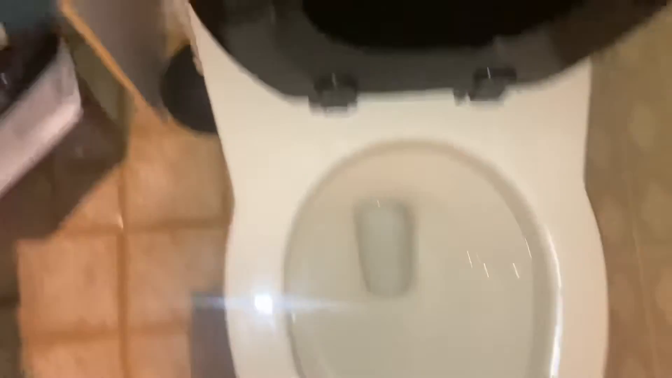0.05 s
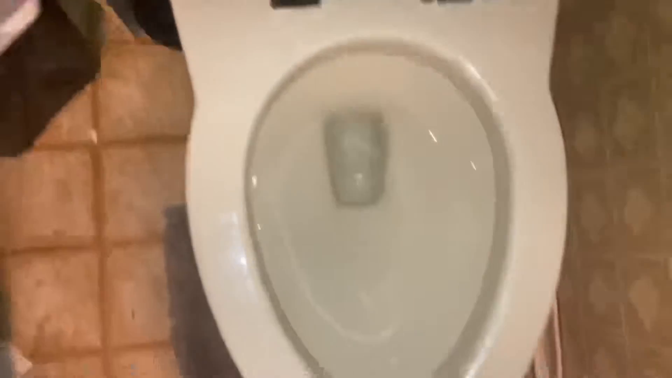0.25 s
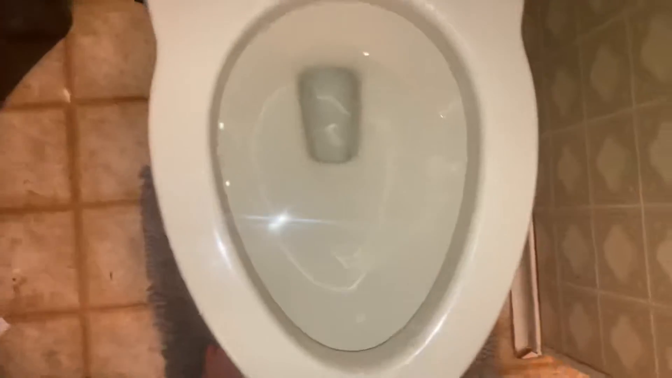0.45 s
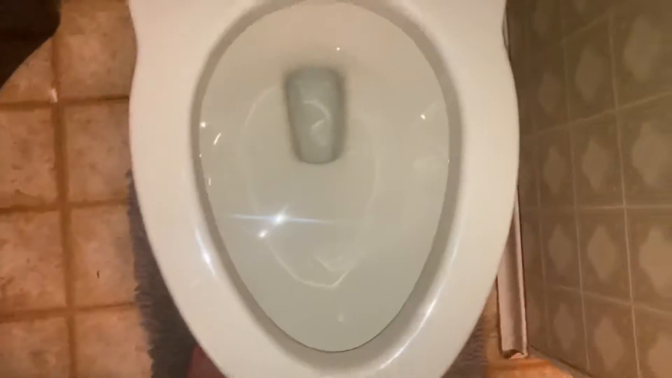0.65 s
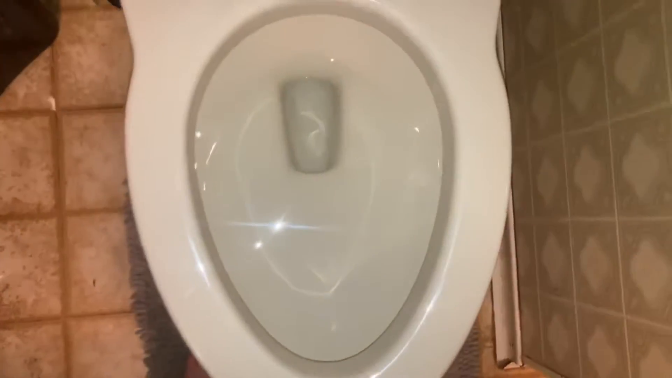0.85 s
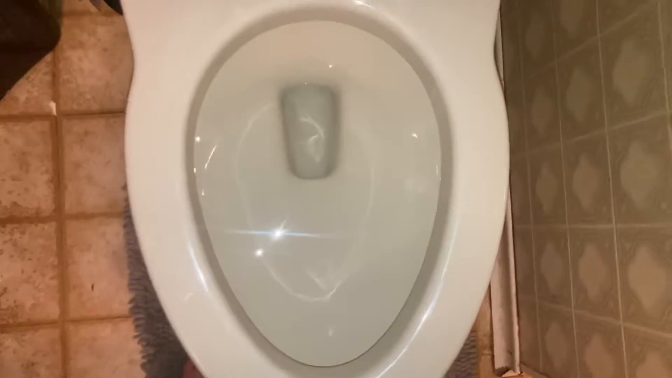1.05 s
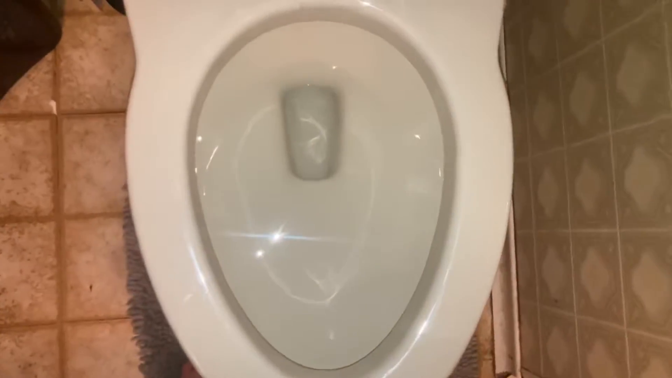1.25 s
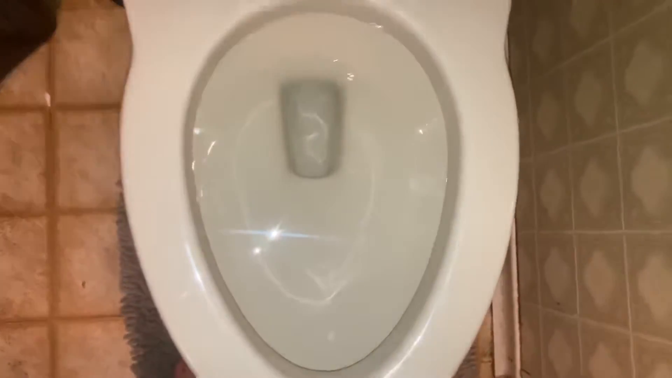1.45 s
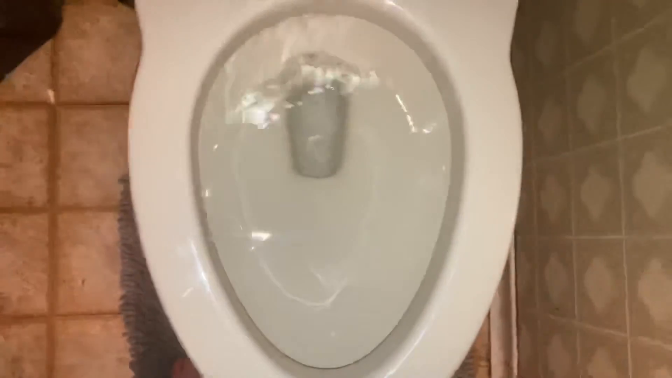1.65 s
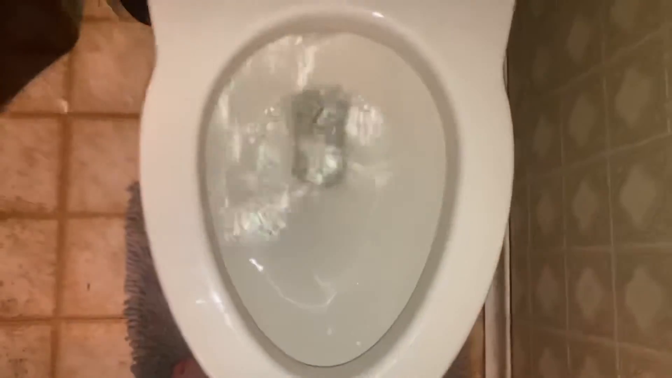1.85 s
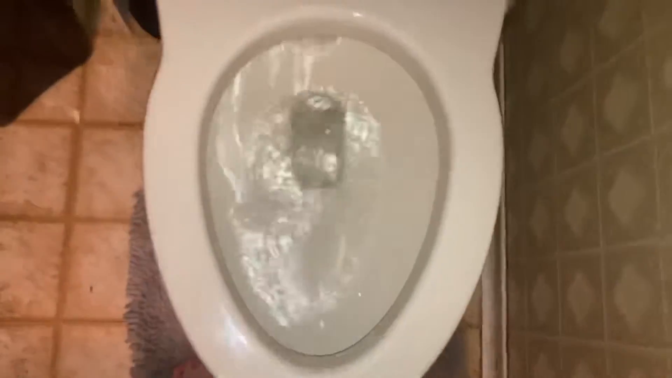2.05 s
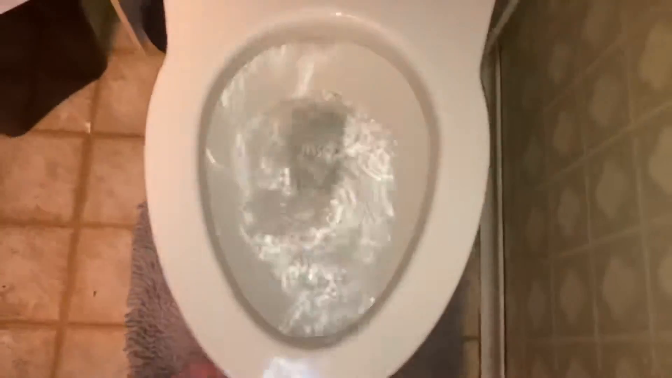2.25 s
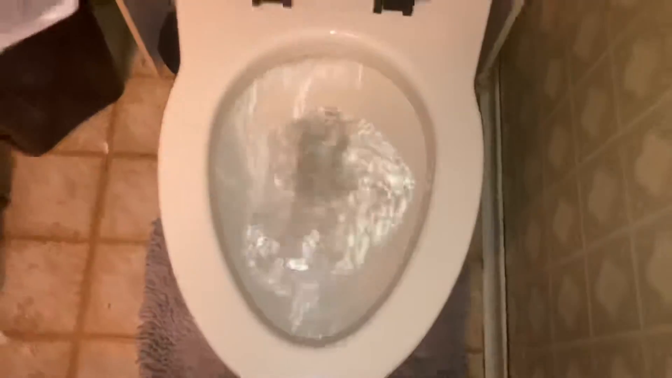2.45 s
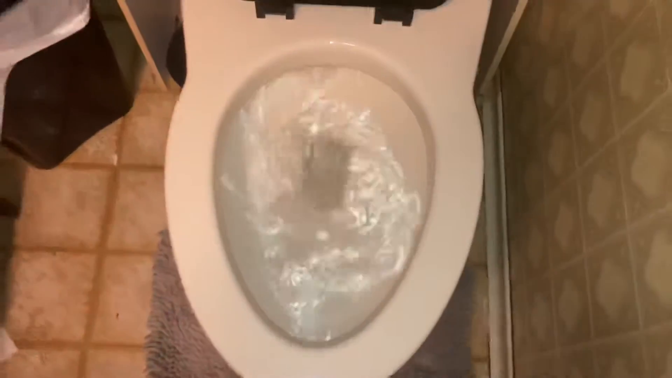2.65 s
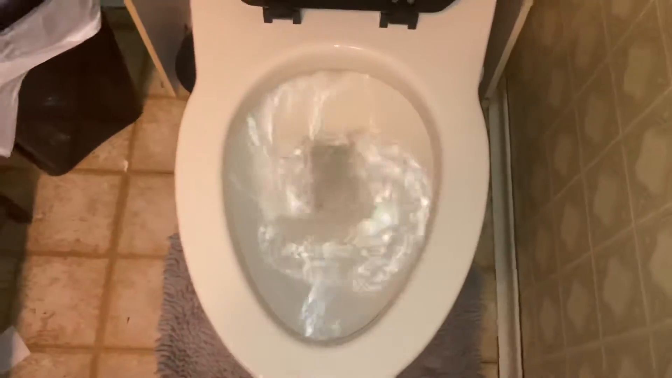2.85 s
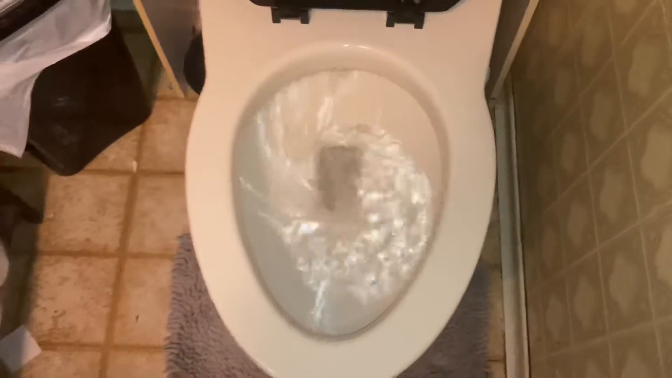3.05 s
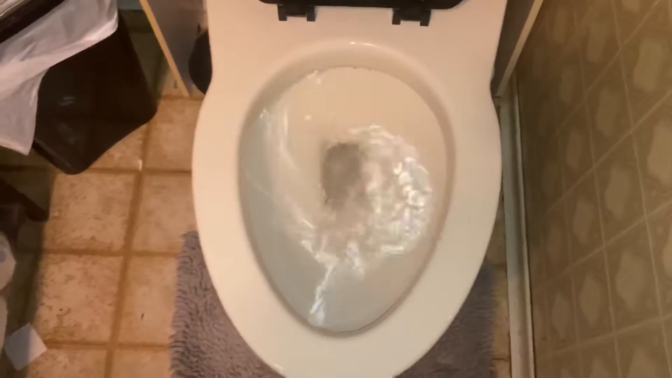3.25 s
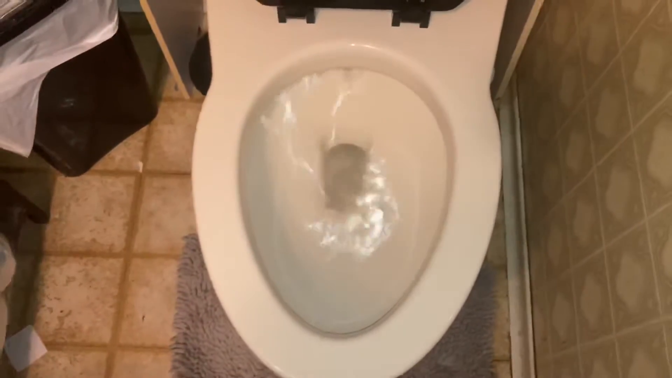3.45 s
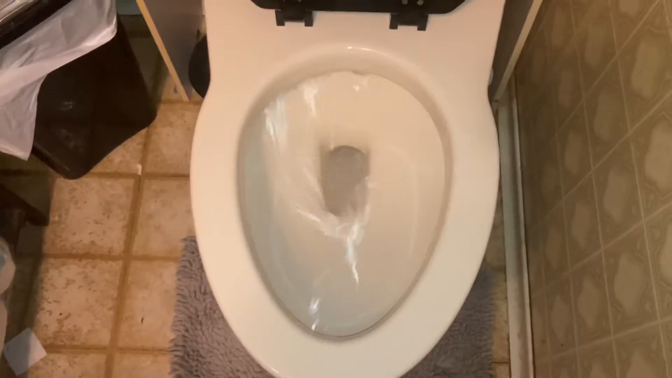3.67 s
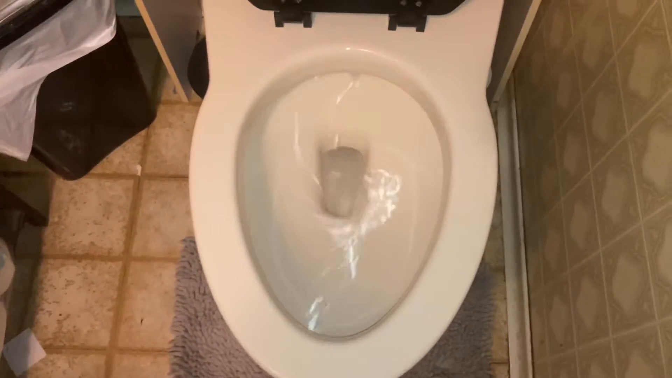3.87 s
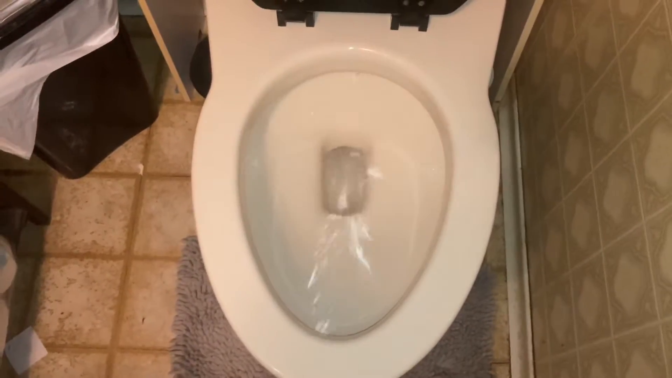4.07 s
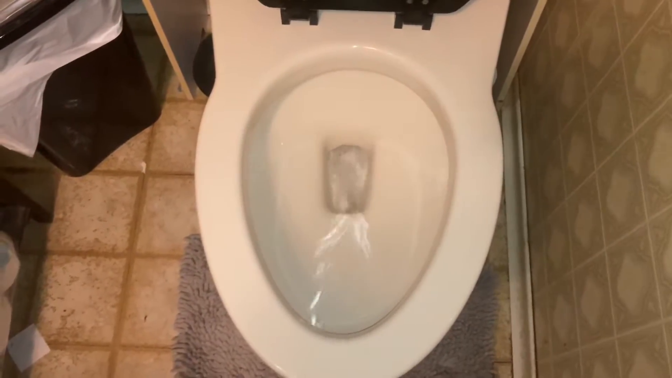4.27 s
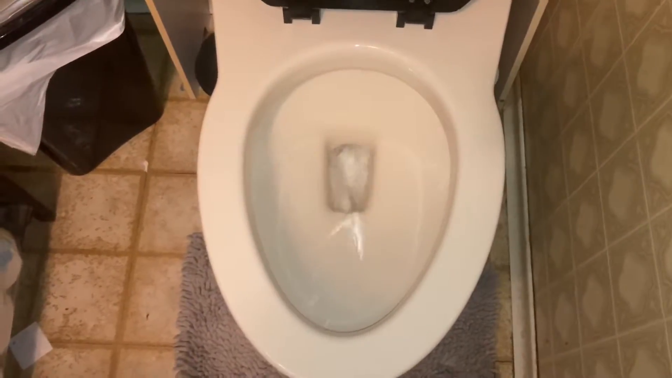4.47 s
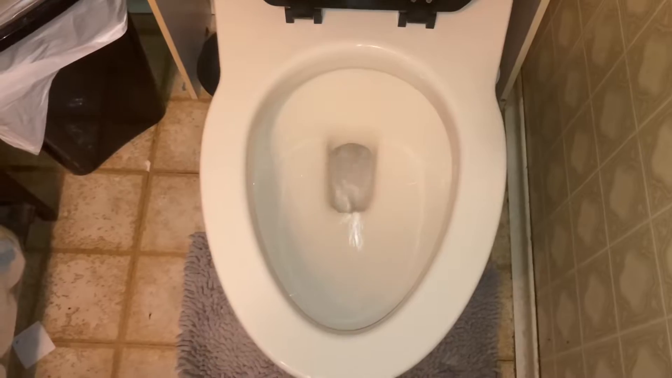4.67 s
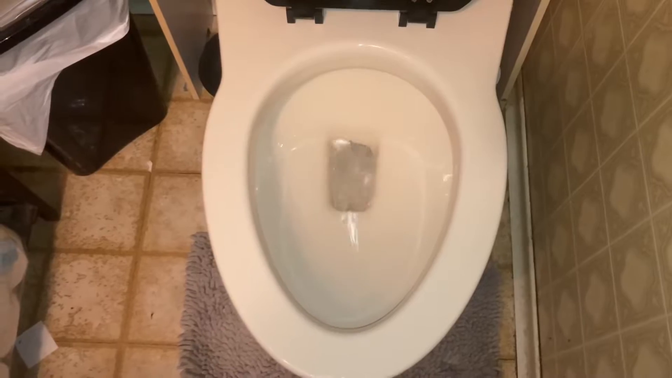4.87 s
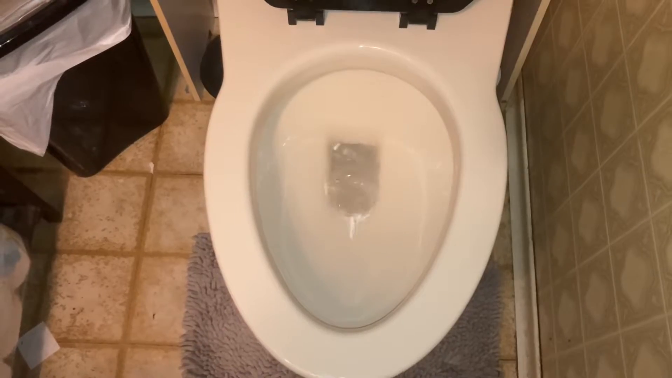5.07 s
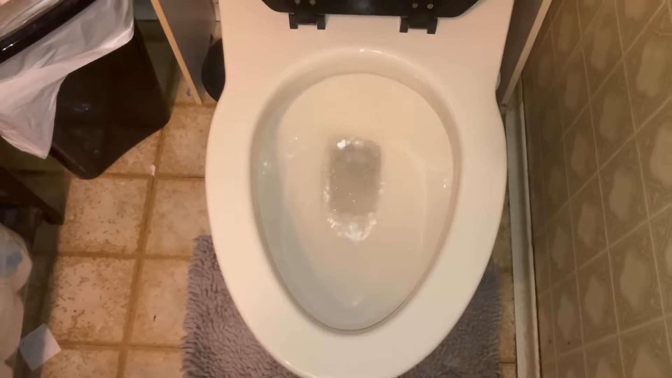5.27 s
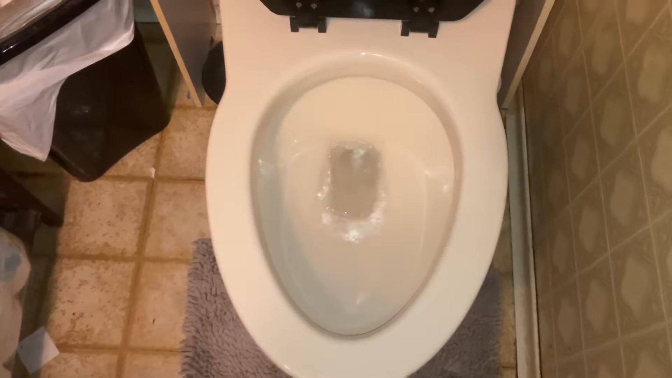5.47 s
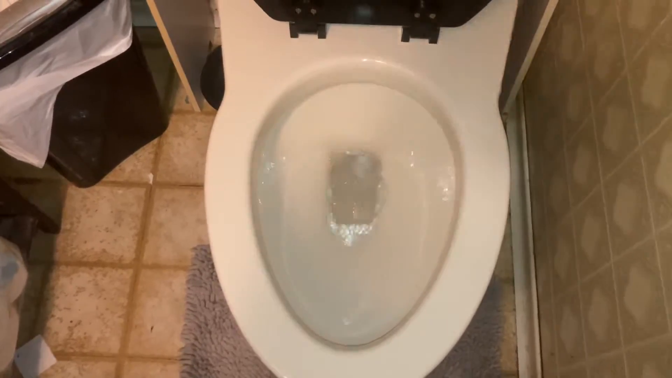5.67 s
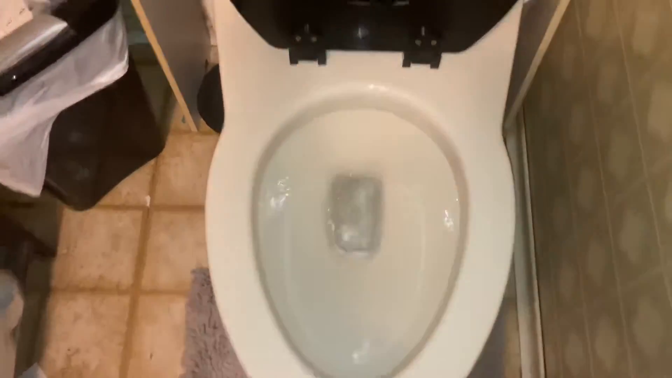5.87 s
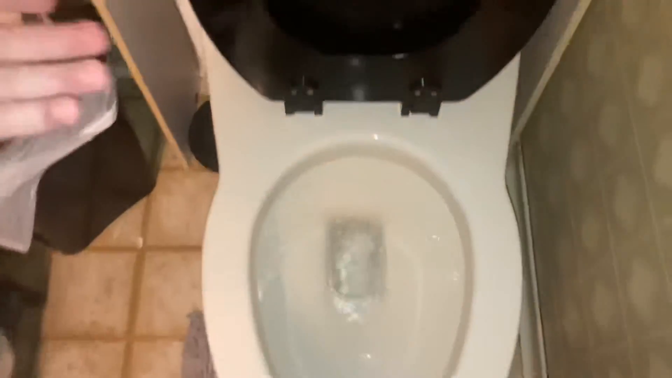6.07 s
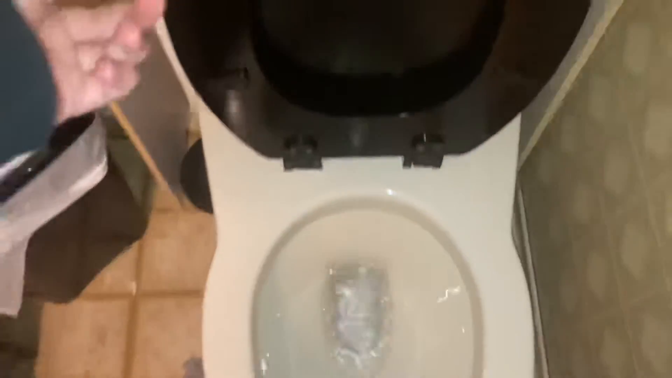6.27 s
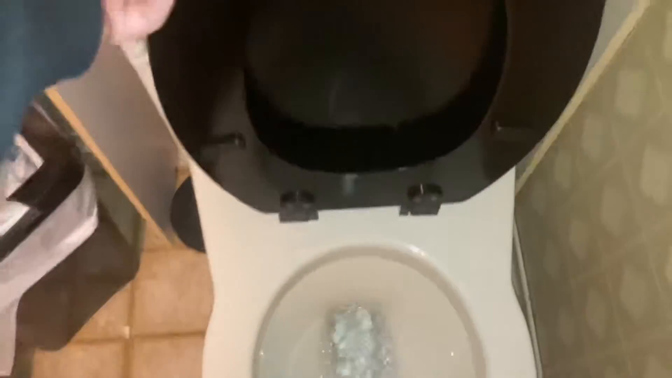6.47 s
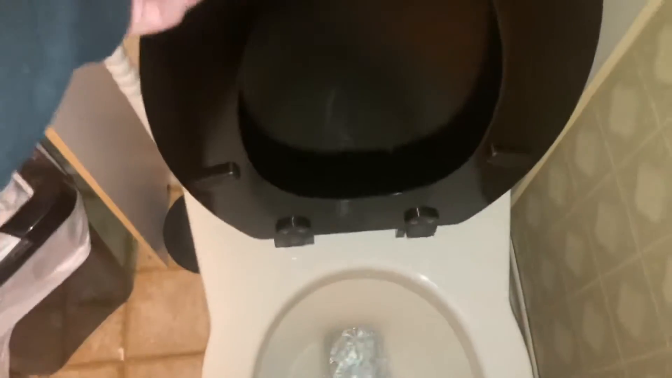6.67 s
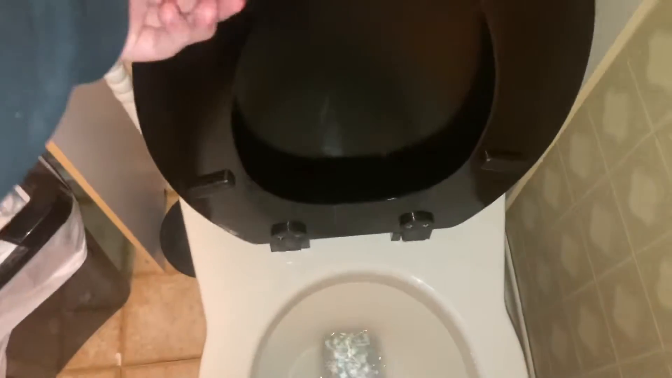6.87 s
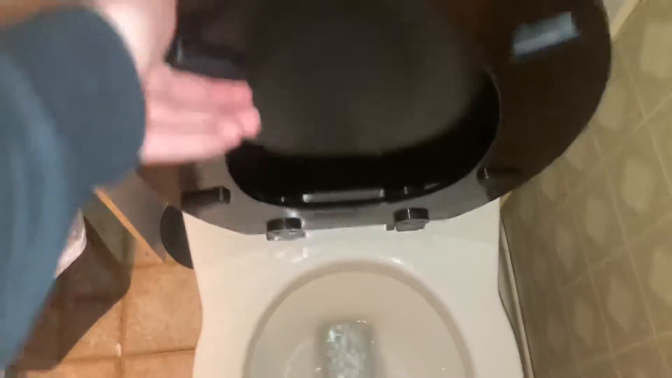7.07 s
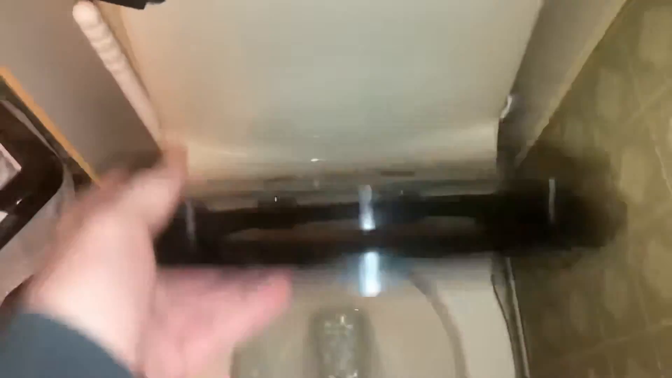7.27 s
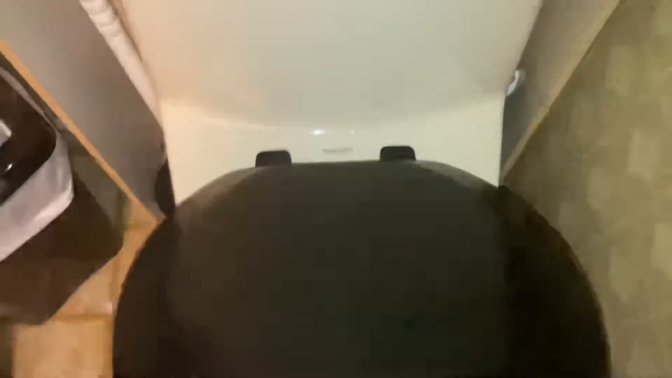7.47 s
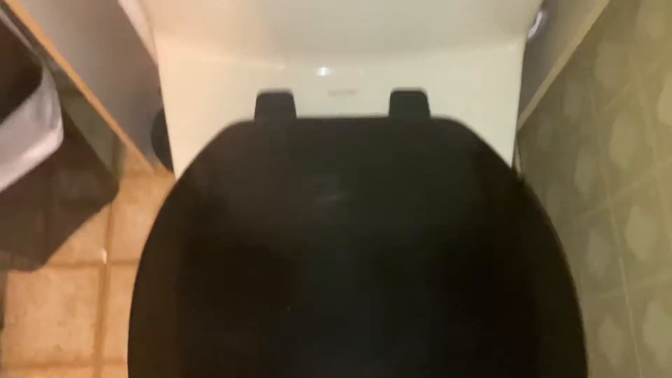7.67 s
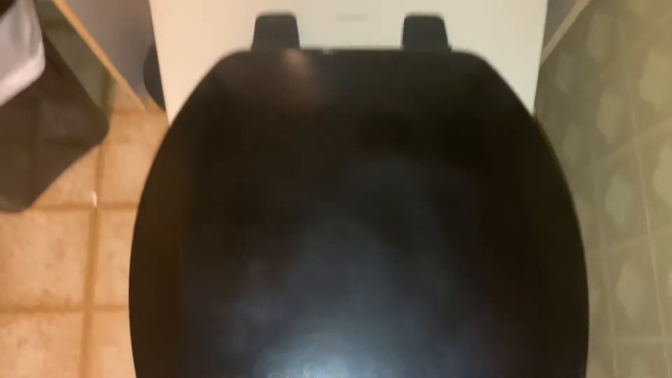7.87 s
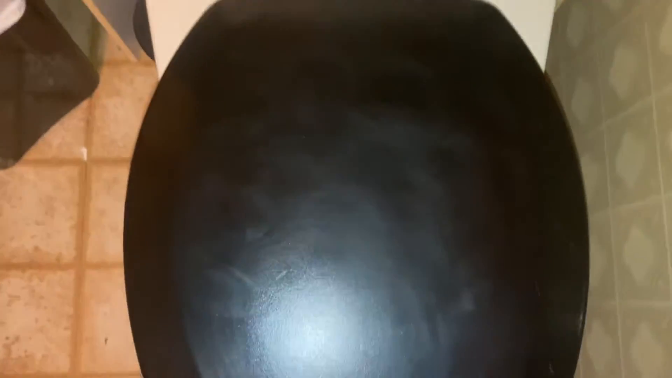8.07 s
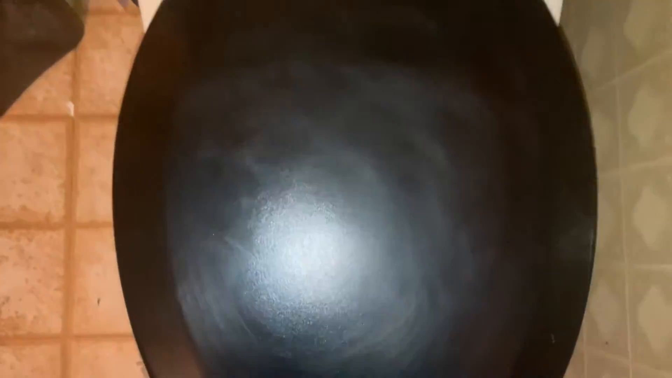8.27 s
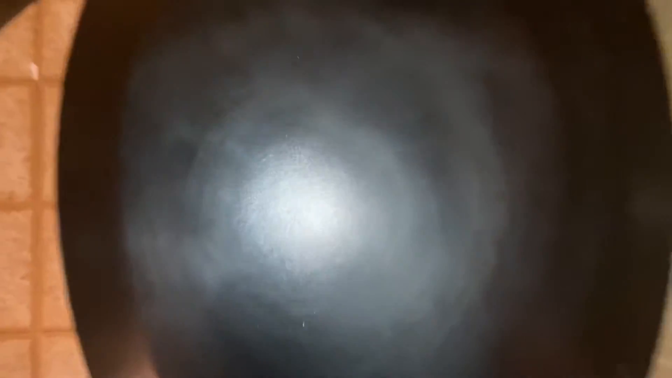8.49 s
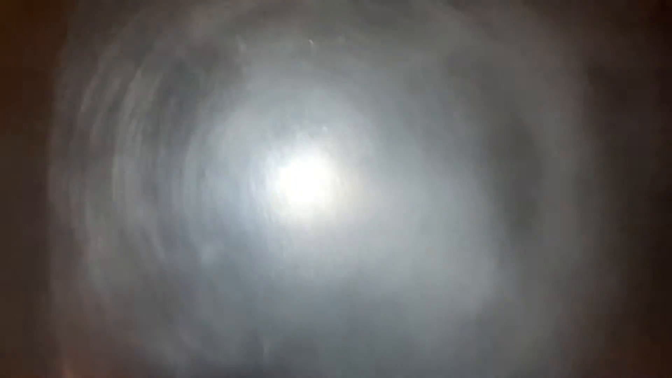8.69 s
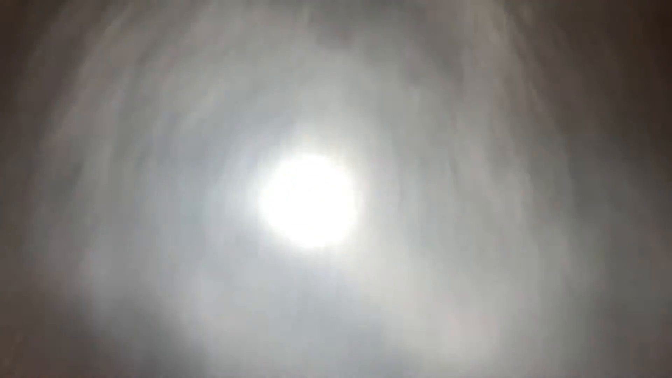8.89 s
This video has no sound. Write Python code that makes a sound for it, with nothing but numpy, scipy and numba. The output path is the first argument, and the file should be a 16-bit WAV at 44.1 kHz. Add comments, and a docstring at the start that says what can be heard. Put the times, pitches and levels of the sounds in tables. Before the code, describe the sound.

In a small tiled bathroom, a stereo microphone is held close above a toilet bowl. For the first second there is only faint mains hum and still air, with a barely audible tick near 0.4. At 1.0 the flush lever clicks; air hoots and spits from the rim, and from 1.3 to 1.7 water bursts in with turbulent roars, deep gurgles and a brief squeal. From 2 to 3 it swirls and splashes steadily, with bright crackling spray. From 3.1 to 4.3 the siphon pulls: hollow, rapid gulps, popping bubbles and low pipe rumble. The gurgling fades by about 5, leaving a faint trickle and steady hissing tank refill over a low rush. At 7.3 the plastic seat clacks sharply, and the hiss brightens slightly. At 8.35 the lid slams with a loud, booming thud and small rattling rebounds, while the hiss continues.

```python
"""In a small tiled bathroom, a toilet is flushed, heard from just above the bowl.
Water drives the air out of the rim in hoots, then swirls and splashes as clouds of rising bubble notes.
The siphon gulps air, which rings in the trap, and the bowl drains with a rumble of filtered bubbles.
The tank refills with a steady hiss of shaped noise over ringing air.
The seat clacks as it is tipped forward and the lid thuds shut, each as a crack, fading tones and a boom."""
import sys
import numpy as np
from scipy import signal
from scipy.fft import rfft, irfft, next_fast_len
from scipy.io import wavfile
from scipy.ndimage import uniform_filter1d
from numba import njit

SR = 44100
rng = np.random.default_rng(int(sys.argv[2]) if len(sys.argv) > 2 else 0)


def log_audio(samples):
    """Write samples as a 16-bit WAV file to the path given in sys.argv[1]."""
    # one column per channel
    frames = np.atleast_2d(samples).T
    # limit to full scale, then quantise
    limited = np.clip(frames, -1, 1)
    pcm = np.round(limited * 32767).astype(np.int16)
    wavfile.write(sys.argv[1], SR, pcm)


N = 393813
TIME = np.arange(N) / SR
OPEN_S = 1.03  # the flapper opens
SHUT_S, RUN_OUT_S = 4.9, 0.1  # it drops back, and the last water runs out of the rim


# upper resonances of the rim channel: f/Hz, width/Hz, level/dB
RIM_MODES = [(1710, 17, 5), (2150, 61, -10), (2320, 24, -6), (2668, 37, 0.5), (2790, 41, -9),
             (3170, 39, -14), (3930, 40, -16), (4360, 40, -15)]
# puffs of air that blow the rim's second note: start t/s, length/s, level/dB
RIM_PUFFS = [(1.087, 0.03, -46), (1.17, 0.12, -38), (1.275, 0.14, -33), (1.394, 0.046, -29),
             (1.474, 0.039, -30), (1.707, 0.05, -34), (1.763, 0.041, -36.5), (1.953, 0.051, -35),
             (2.118, 0.063, -34)]
# the rim holes spit air and water: t/s, level/dB
SPITS = [(1.033, -47.5), (1.184, -39), (1.408, -42), (1.476, -34), (1.538, -30)]
# jets squeal through the rim holes: start t/s, length/s, level/dB
SQUEALS = [(1.512, 0.033, -32.5), (1.978, 0.017, -39.5)]
# the lowest note of the rim sinks as it floods; the second only wavers
RIM_START_HZ, RIM_FLOODED_HZ, RIM_FLOOD_S, RIM_SECOND_HZ = 475, 345.6, 0.29, 1089
SPIT_T60_S = 0.16


def rim_air():
    """Water from the tank pushes air through the rim, which hoots like a stopped pipe, spits and squeals."""
    flooding = np.exp(-np.maximum(TIME - OPEN_S, 0) / RIM_FLOOD_S)
    hz = RIM_FLOODED_HZ + (RIM_START_HZ - RIM_FLOODED_HZ) * flooding
    low = hoot(hz * (1 + 0.025 * walk(35)), flutter_rate=100, steady=0.9) * stage("rim low note")

    puffs = sum(undb(db) * arch(s, length) for s, length, db in RIM_PUFFS)
    second = hoot(RIM_SECOND_HZ * (1 + 0.014 * walk(40)), flutter_rate=120, steady=1)
    second = second * (stage("rim second note") + puffs)

    spits = sum(undb(db) * (TIME > s) * fade(np.abs(TIME - s), SPIT_T60_S) for s, db in SPITS)
    hiss = unit(colour(rng.standard_normal(N), [(1100, 1.0), (1400, -3), (2800, 0), (5000, -1)]))
    air = cavity(rng.standard_normal(N), RIM_MODES) + hiss * undb(-8.5)
    air = air * (stage("rim air") + spits)

    squeal_gain = sum(undb(db) * arch(s, length) for s, length, db in SQUEALS)
    squeal = hoot(4270, flutter_rate=640) * squeal_gain
    tumble = bubbles([(160, 8), (280, 8), (450, -9), (600, -18)], count=3000, cycles=18,
                     spread_db=2.5, glide=0.11, surge_db=8.0, surge_rate=24)
    return tumble * stage("tank outlet") + low + second + squeal + air


# water roars out of the tank in turbulent surges: start t/s, length/s, level/dB
SURGES = [(1.034, 0.064, -38.5), (1.29, 0.095, -31), (1.355, 0.22, -26.5), (1.515, 0.15, -20.5),
          (1.63, 0.19, -29)]
# colour of that roar: f/Hz, level/dB
ROAR = [(140, -9.5), (170, 2.5), (235, 0.5), (290, 3.5), (395, 1.5), (470, -4), (620, -19), (860, -14.5),
        (1300, -19), (2000, -24), (3000, -26)]


def surges():
    """Each surge of water through the rim is an unbroken, turbulent roar."""
    roar = unit(colour(rng.standard_normal(N), ROAR))
    return roar * sum(undb(db) * arch(s, length) for s, length, db in SURGES)


# colour of the low gurgle of the incoming water: f/Hz, level/dB
INFLOW_GURGLE = [(120, -40), (165, -9), (192, -11), (238, 3.5), (290, -1), (390, 4), (450, -5),
                 (560, -16.5), (700, -36)]
# colour of its splash: f/Hz, level/dB
INFLOW_SPLASH = [(470, -39), (800, -0.5), (866, -1), (971, -8), (1070, 4), (1310, -10.5), (1400, 4.5),
                 (1620, -6), (1760, 2.5), (1820, -21), (1970, -0.5), (2210, -14.5), (3400, -11.5),
                 (4420, -12.5), (7480, -120)]
# resonances of the air in the open trap: f/Hz, width/Hz, level/dB
TRAP_MODES = [(686.7, 34, -3.5), (784, 27, -13.5), (986, 34, -18), (1225.5, 31, -9), (1515, 13, -16),
              (1692, 23, -18.5), (1925, 31, -22.5), (2262, 20, -23), (2570, 41, -28.5), (2900, 25, -29)]


def inflow():
    """Water tumbles out of the rim, gurgles with the air it carries, and swirls round the bowl."""
    landing, splash = stage("landing"), stage("splash")
    low = bubbles(INFLOW_GURGLE, count=3000, cycles=16,
                  spread_db=1.0, glide=0.22, surge_db=1.0, surge_rate=25)
    high = bubbles(INFLOW_SPLASH, count=9000, cycles=22,
                   spread_db=2.0, glide=0.14, surge_db=1.7, surge_rate=25)
    froth = bubbles([(480, 7.0), (650, -9), (950, -5.0)], count=2500, cycles=16,
                    spread_db=-2.0, glide=0.17, surge_db=5.0, surge_rate=37)

    vortex = np.interp(TIME, [2.0, 2.5], [0, 1])  # the swirl digs a hollow down to the trap
    hollow = cavity(rng.standard_normal(N) * undb(7.3 * walk(30.05)), TRAP_MODES) * vortex * undb(1.5)

    gurgle = low * (stage("first rush") + stage("swirl"))
    return gurgle + high * (landing + splash) + hollow * splash + froth * landing * undb(1.0)


# how hard the siphon works, before the mix of its parts: t/s, gurgle level/dB, splash level/dB
SUCTION = [(3.1, -48, -37.5), (3.204, -31, -33.5), (3.366, -30, -29), (3.668, -30.5, -33.5),
           (3.824, -26.5, -31.5), (4.102, -27, -33), (4.25, -21.5, -34.5), (4.374, -38, -36.5),
           (4.608, -50.5, -36), (4.832, -49, -43.5), (4.97, -53, -48.5), (5.2, -84, -68.5)]
# colour of the siphon's gurgle: f/Hz, level/dB
SIPHON_GURGLE = [(130, -18), (190, -14), (262, 3.5), (315, -2), (372, 2.5), (430, -0.5), (520, -22),
                 (650, -45)]
# colour of the siphon's splash: f/Hz, level/dB
SIPHON_SPLASH = [(450, -36.5), (760, 2.5), (1140, 3.5), (1210, -7), (1320, 3), (1630, 1.5), (1980, -1.5),
                 (2100, -6), (2350, -8), (2700, -18), (2960, -10), (3400, -36), (4420, -13), (7480, -35)]


def siphon():
    """The water level drops to the trap, which gulps air and rings like a jug."""
    gurgle, splash = gains(SUCTION)
    low = bubbles(SIPHON_GURGLE, count=1800, cycles=20,
                  spread_db=1, glide=0.2, surge_db=2.5, surge_rate=25)
    high = bubbles(SIPHON_SPLASH, count=11000, cycles=20,
                   spread_db=2.3, glide=0.15, surge_db=2.8, surge_rate=30)
    trap = cavity(rng.standard_normal(N) * undb(4.2 * walk(30)), TRAP_MODES)
    return low * gurgle * undb(2.5) + splash * (high * undb(-3.5) + trap * undb(-1.0))


# big air pockets, levels relative to each other: t/s, level/dB, f/Hz at the start, t60/s, swell/s
GLUGS = [(1.365, -1, 239, 0.1, 0.0037), (1.402, -7.5, 220, 0.16, 0.0043), (1.469, -8, 219, 0.14, .004),
         (1.5, -1.5, 238.7, 0.14, 0.0017), (1.579, -9, 315, 0.07, 0.0023), (1.494, -9, 395, 0.066, 0.0036),
         (1.592, -15, 165, 0.12, .004), (1.672, -3.5, 240.6, 0.1, 0.032), (2.069, -16, 319, 0.05, 0.0035),
         (2.13, -14.5, 226, 0.1, 0.0032), (2.202, -16.5, 291, 0.11, .002), (2.256, -18, 385, 0.055, 0.0026),
         (2.508, -23.5, 274, 0.43, 0.0088), (2.735, -15.5, 285, 0.063, 0.0026),
         (3.207, -5.5, 356, 0.086, 0.0019), (3.249, -14, 402.3, 0.16, .002), (3.4, -22, 295, 0.14, 0.0016),
         (3.556, -10, 365, 0.06, 0.0022), (3.61, -2.5, 371.4, 0.12, 0.0032), (3.64, -7, 358, 0.19, 0.0023),
         (3.704, -9, 351, 0.1, 0.0032), (3.727, -5, 376, 0.072, .002), (3.783, -13, 242, 0.15, 0.0077),
         (3.803, -10.5, 275, 0.08, 0.0025), (3.86, -16, 285, 0.089, .003), (3.848, -4.5, 383, 0.098, 0.002),
         (3.929, -3, 388, 0.063, .002), (3.932, -8, 265, .1, .003), (3.947, -5, 366.5, 0.17, 0.0058),
         (4.018, -7.5, 264.4, 0.13, 0.0046), (4.062, -9, 268, .09, 0.0033), (4.153, -8, 381, 0.056, 0.0017),
         (3.994, -9, 389, 0.085, .002), (4.038, -3.5, 369, 0.15, 0.0018), (4.13, -4, 308, 0.037, 0.0017),
         (4.176, -11, 414, .06, .003), (4.192, -5, 344, 0.085, 0.0059), (4.219, -3.5, 281, 0.08, 0.0022),
         (4.408, -26, 365, 0.064, 0.0026), (4.926, -26.5, 305, 0.081, 0.0026)]


def glugs(glide=0.21, churn=0.22):
    """Big air pockets swell, throb at their own rising pitch and churn the water round them."""
    out, t = np.zeros(N), TIME[:SR // 3]
    for s, db, hz, t60, swell_s in GLUGS:
        shape = (1 - np.exp(-t / max(swell_s, 1e-4))) ** 2 * fade(t, t60)
        rough = unit(colour(rng.standard_normal(len(t)), SIPHON_GURGLE))
        tone = np.sin(2 * np.pi * hz * t * (1 + glide * t))
        add(out, s, undb(db) * shape / shape.max() * (tone + churn * rough))
    return out * undb(-6.0)


# bubbles bursting in the bowl, each level relative to others of its column:
# t/s, note level/dB, f/Hz at the start, splatter level/dB, t60/s
PLOPS = [(1.368, -16.5, 740, -28, 0.04), (1.576, -10, 870, -22, 0.086), (1.594, -16, 1026, -19, 0.055),
         (1.643, -6.5, 1890, -23.5, 0.03), (1.726, -19, 1300, -26, 0.056), (1.74, -20, 1930, -32, 0.035),
         (2.05, -12.5, 1605, -44, 0.028), (2.198, -18, 1080, -37, .04), (2.225, -24, 804, -24.5, 0.025),
         (2.248, -20.5, 1780, -24.5, .05), (2.142, -15.5, 1057, -32, 0.049), (2.338, -4.5, 955, -51, 0.018),
         (2.454, -11.5, 1774, -30, 0.034), (2.587, -24, 1610, -39, 0.032), (2.744, -19, 686, -35, 0.067),
         (3.085, -16.5, 1515, -27, 0.037), (3.174, -14, 1430, -25, 0.044), (3.558, -25, 694, -44, .05),
         (4.065, -7, 678, -48, 0.055), (2.863, -10.5, 1593, -49, 0.04), (2.926, -13, 1485, -20.5, 0.15),
         (2.937, -7, 1825, -18.5, 0.045), (3.146, -21, 875, -16, 0.025), (3.251, -4, 687, -14, 0.045),
         (3.274, -17, 665, -22, 0.063), (3.306, -13, 1244, -39, 0.043), (3.176, -18, 1734, -29, 0.041),
         (3.276, -9, 1653, -29, 0.043), (3.352, -9, 1230, -17.5, 0.028), (3.369, -19, 676, -34, .05),
         (3.713, -16, 1630, -32, 0.04), (3.823, -18, 1980, -26, 0.035), (3.853, -19, 1540, -32, 0.036),
         (4.141, -18, 1630, -28, 0.052), (4.161, -20, 2000, -21, .05), (4.222, -12, 1640, -26, 0.027),
         (3.402, -16, 1657, -14, 0.083), (3.604, -10.5, 668, -16.5, 0.096), (3.638, -4, 697, -18, 0.076),
         (3.708, -16, 674, -14.5, 0.076), (3.83, -6.5, 667.5, -12, 0.19), (3.932, -9.5, 675, -13, 0.096),
         (3.994, 5, 717, -19.5, 0.046), (4.132, -8.5, 673, -21, 0.062), (4.22, -8.5, 700, -22, 0.04),
         (4.26, -7.5, 685, -30, 0.033), (4.288, -4.5, 655, -22, 0.076), (4.35, -38, 1370, -21, 0.056),
         (4.368, -21, 2285, -24, 0.043), (4.43, -14.5, 776, -49, 0.044), (4.475, -16.5, 660, -51, 0.056),
         (4.523, -17.5, 1629, -29, 0.17), (4.658, -16, 1340, -41, 0.037), (4.675, -19, 703, -26, 0.065),
         (4.58, -18.5, 1250, -30, 0.041), (4.79, -24, 1230, -30, 0.08), (4.925, -29, 692, -44, 0.12),
         (5.243, -28.5, 1930, -53, 0.027), (5.25, -32, 1510, -52, 0.043), (6.04, -40.5, 1630, -64, 0.11),
         (7.965, -33.5, 6180, -66, .04)]
# colour of fine spray: f/Hz, level/dB
SPRAY = [(1800, 3.5), (2700, 1.5), (3600, 0.5), (5000, -2.5), (6500, 1.7), (8200, 2), (11000, 2),
         (13500, -1), (15800, -5.5)]
PLOP_SWELL = 0.038  # share of its t60 that a bubble needs to swell


def plops(glide=0.5, splatter_t60=0.077, mist_db=-13, trap_db=-3, rough=0.38):
    """Bubbles burst with a short rising note, a splatter that rings the trap and a puff of mist."""
    out, t = np.zeros(N), TIME[:SR // 4]
    splash, mist, air = rng.standard_normal((3, 2 * SR))
    wet = unit(colour(splash, SIPHON_SPLASH))
    wet = wet + undb(mist_db) * unit(colour(mist, SPRAY))
    wet = unit(wet + undb(trap_db) * cavity(air, TRAP_MODES))
    for s, db, hz, splatter_db, t60 in PLOPS:
        wobble = rough * unit(colour(rng.standard_normal(len(t)), [(30, 0), (200, 0)]))
        note = np.sin(2 * np.pi * hz * t * (1 + glide * t) + wobble)
        note = undb(db - 5) * note * fade(t, t60)
        piece = np.roll(wet, rng.integers(len(wet)))[:len(t)]  # a random stretch of the wet noise
        splatter = undb(splatter_db - 3) * piece * fade(t, splatter_t60)
        swell = 1 - np.exp(-t / max(PLOP_SWELL * t60, 1e-4))
        add(out, s, (note + splatter) * swell)
    return out


# drops snapping on the porcelain, levels relative to each other: t/s, level/dB
DROPS = [(2.215, -35), (2.321, -32.5), (2.611, -33), (2.713, -37.5), (2.06, -34), (2.824, -54),
         (2.906, -36.5), (3.2089, -27.5), (3.251, -28), (3.359, -35), (3.399, -32.5), (3.437, -29),
         (3.235, -29.5), (3.604, -33.5), (3.76, -45), (4.08, -41), (4.095, -32), (4.136, -23.5),
         (4.289, -45), (4.603, -37), (4.671, -39.5), (4.784, -50), (4.899, -47)]


def drops(t60=0.027, patter_t60=0.057, patter_db=-15):
    """Single drops snap sharply above the spray, each with a weaker, longer patter."""
    out, t = np.zeros(N), TIME[:SR // 8]
    for s, db in DROPS:
        shape = fade(t, t60) + undb(patter_db) * fade(t, patter_t60)
        snap = colour(rng.standard_normal(len(t)) * shape, SPRAY)
        add(out, s, undb(db + 15.0) * snap / np.abs(snap).max())
    return out


CHURN_S, CHURN_LENGTH_S, CHURN_DB = 3.49, 0.86, 2.5  # extra spray while the siphon gulps


def spray():
    """Spray crackles and tiny bubbles ping while the tank feeds the bowl; a thin film runs off afterwards."""
    feed = np.clip(1 - (TIME - SHUT_S) / RUN_OUT_S, 0, 1)
    churn = undb(CHURN_DB * arch(CHURN_S, CHURN_LENGTH_S))
    flow = feed * np.hypot(stage("rim spray"), stage("bowl spray")) * churn + stage("run-off")
    crackle = bubbles(SPRAY, count=70000, cycles=0.51,
                      spread_db=1.5, glide=0, surge_db=3.0, surge_rate=45)
    fizz = bubbles(SPRAY, count=7000, cycles=65,
                   spread_db=2.8, glide=0.05, surge_db=2.2, surge_rate=34)
    return crackle * undb(0.5) * flow, fizz * undb(3.0) * flow


# slugs of water boom through the tank outlet and the drain:
# start t/s, length/s, f/Hz at the start, drone level/dB, rumble level/dB
SLUGS = [(1.05, 0.053, 165, -51, -68), (1.364, 0.072, 172, -21, -38), (1.501, 0.21, 171.4, -31, -34.5),
         (2.078, 0.18, 156.5, -44.5, -39.5), (3.129, 0.14, 116, -28, -43), (3.23, 0.186, 75, -41, -35),
         (3.396, 0.43, 107.6, -25, -36.5), (3.738, 0.28, 84, -37, -42)]
# colour of the rumble: f/Hz, level/dB
RUMBLE = [(25, -71), (50, 10.5), (75, 11.5), (100, 2), (125, -7), (170, 4)]
SLUG_SAG = 0.136  # share of its pitch that a slug loses as it passes


def drain():
    """The pipes rumble, and each slug of water adds a sinking drone and more rumble."""
    drone, load = 0, stage("drain")
    for s, length, hz, drone_db, rumble_db in SLUGS:
        pitch = hz * (1 - SLUG_SAG * np.clip((TIME - s) / length, 0, 1))
        swell = arch(s, length)
        drone = drone + hoot(pitch, flutter_rate=54, steady=1.14) * swell * undb(drone_db)
        load = load + swell * undb(rumble_db)
    rumble = bubbles(RUMBLE, count=1200, cycles=13.0,
                     spread_db=-2.0, glide=0.14, surge_db=-1.5, surge_rate=130)
    return drone + load * rumble


# how the parts of the flush come and go, by name:
# start t/s, full t/s, release t/s, rise/dB, fall/(dB per s), level/dB before the mix
STAGES = { "rim low note": (1.1, 1.33, 1.55, 7, 46, -31.5), "rim second note": (1.5, 1.7, 2, 12, 27, -41.5),
          "tank outlet": (1.1, 8, 2, 6.5, 58.5, -36), "rim air": (1.04, 1.8, 2, 8.5, 63, -44),
          "first rush": (2.16, 0.5, 2.32, -1, 75, -34), "landing": (1.4, -1, 1.4947, 7.5, 80, -31),
          "swirl": (1.45, 1.74, 2, 7, 8, -35), "splash": (1.14, 1.97, 3, 18, 24, -39),
          "rim spray": (1.03, 1.22, 1.22, 16, 22, -45.5), "bowl spray": (1.67, 1.1, 4.68, -8, 33, -44),
          "run-off": (5, 3, 6, 3, 23, -63), "drain": (2.04, 4, 2.5, 8.5, 5.5, -43.5)}


def stage(name):
    """Gain of one part: it opens, moves to its level (at once if full is before start), then dies away."""
    start_s, full_s, release_s, rise_db, fall_db_per_s, level_db = STAGES[name]
    db = np.interp(TIME, [start_s, full_s], [-rise_db, 0])
    db = db - fall_db_per_s * np.maximum(TIME - release_s, 0)
    return undb(level_db + db) * uniform_filter1d(1. * (TIME > start_s), size=800)


# blows on the flush lever: t/s, ring level/dB, crack level/dB, boom level/dB
HANDLE_KNOCKS = [(1.003, -65, -68, -57), (1.021, -38, -57, -74), (1.035, -36, -47, -58)]
# modes of the flush lever: f/Hz, level/dB, t60/s
HANDLE_MODES = [(1722, -7, 0.38), (2320, -1, 0.12), (2660, 0, 0.095), (2780, -5, 0.09)]
# blows of the seat: t/s, ring level/dB, crack level/dB, boom level/dB
SEAT_KNOCKS = [(7.301, -24.5, -36.5, -37.5), (7.312, -22, -45, -49), (7.331, -30, -53, -40)]
# modes of the seat: f/Hz, level/dB, t60/s
SEAT_MODES = [(314, -8.5, 0.93), (418, -1, .27), (520, -8.5, 0.32), (603, 1.5, 0.26), (742, -6.5, 0.18),
              (1038, -1.5, 0.098), (1213, -2.5, 0.096), (1390, -16, .12), (1654, -4.5, 0.1),
              (2190, -8, 0.062)]
# blows of the lid: t/s, ring level/dB, crack level/dB, boom level/dB
LID_KNOCKS = [(8.3405, -24, -27, -32), (8.3442, -4.5, -34, -17), (8.3605, -23, -42, -32),
              (8.374, -37, -45, -27), (8.391, -16.5, -48, -28), (8.444, -38, -62, -36),
              (8.52, -42, -54, -45)]
# modes of the lid on the bowl: f/Hz, level/dB, t60/s
LID_MODES = [(221.5, -2.5, .42), (289.3, 4.5, .1), (308, 3.5, 0.17), (600, -13, 0.16), (641, -15, 0.22),
             (799, -22, 0.28), (945, -8, 0.25), (1120, -22, 0.22), (1256, -9, 0.11), (1432, -21, 0.16),
             (1459, -23, .16), (1685, -29, .16), (2094, -26, .09), (2285, -27, .08)]
# a faint tick of handling before the flush: t/s, ring level/dB, crack level/dB, boom level/dB
TICKS = [(.415, -75, -92, -90)]
# its mode: f/Hz, level/dB, t60/s
TICK_MODES = [(635, 0, .12)]
# colour of a plastic crack: f/Hz, level/dB
CRACK = [(120, -15), (300, -8), (700, -7), (1400, -11.5), (2300, -1), (3200, -9.5), (4500, -21.5),
         (6000, -34), (15000, -25)]
# colour of the boom that a blow sends through the bowl and the floor: f/Hz, level/dB
BOOM = [(35, -35), (60, 9.5), (120, -4.5), (220, 7.5), (315, 5.5), (420, -24), (700, -23)]


def knocks(blows, modes, contact_s, crack_t60, boom_t60, damped_t60):
    """Blows on a part: a short crack, its modes (damped by what it rests on) and a low boom."""
    out, t = np.zeros(N), TIME[:SR // 2]
    contact = 1 - np.exp(-t / contact_s)
    ring = sum(undb(db) * np.sin(2 * np.pi * hz * t) * fade(t, t60) for hz, db, t60 in modes)
    ring = ring * contact * fade(t, damped_t60)
    ring = ring / np.abs(ring).max()
    for s, ring_db, crack_db, boom_db in blows:
        crack = unit(colour(rng.standard_normal(len(t)), CRACK)) * fade(t, crack_t60)
        boom = unit(colour(rng.standard_normal(len(t)), BOOM)) * fade(t, boom_t60) * contact
        add(out, s, undb(ring_db) * ring + undb(crack_db) * crack + undb(boom_db) * boom)
    return out


# colour of the rush in the pipes: f/Hz, level/dB
REFILL_RUSH = [(70, -13.5), (105, 3.5), (170, 1.5), (200, -6.5), (245, 0), (320, -14.5), (375, -8),
               (550, -15.5), (950, -17.5), (1600, -20.5), (2200, -29), (3000, -59)]
# colour of the valve's hiss: f/Hz, level/dB
REFILL_HISS = [(1500, -14.5), (2400, 10), (3200, 16), (4100, 9.5), (5400, -2.5), (6500, 5), (8300, 2.5),
               (9500, -1), (11500, 1.5), (15800, -10)]
# the air space under the tank lid: f/Hz, width/Hz, level/dB
TANK_MODES = [(560, 24, 2.5), (698, 23, 1), (940, 29, 1.5), (1090, 17, -2), (1346, 67, -5.5),
              (1510, 46, -2.5), (1680, 47, -8.5), (2142, 36, 0), (2880, 120, -3), (3100, 100, 0),
              (3990, 140, 0.5)]
RUSH_DB, HISS_DB, TANK_DB = -47, -53.5, -59.5  # before the swings, the echoes of the tank and the room
# hiss and tank ring grow once the lid is tipped off the tank
UNCOVERED_DB, UNCOVERED_S, APPROACH_DB_PER_S = 2, 7.16, 0.96


def refill(diffuse_db=-7):
    """The fill valve opens: a rush in the pipes, a tank whose resonances waver, and a hiss from all round."""
    opening = np.interp(TIME, [1.1, 2.0], [0, 1])
    rush = unit(colour(rng.standard_normal(N), REFILL_RUSH)) * undb(RUSH_DB + 0.16 * walk(12.0))

    uncovered = np.maximum(TIME - UNCOVERED_S, 0)
    lift_db = UNCOVERED_DB * np.minimum(uncovered / 0.045, 1) + APPROACH_DB_PER_S * uncovered
    valve = undb(lift_db + 1.1 * walk(10))

    jet = swaying(rng.standard_normal(N)) + undb(diffuse_db) * rng.standard_normal((2, N))
    hiss = unit(colour(jet, REFILL_HISS)) * undb(HISS_DB)

    air, tank = rng.standard_normal(N), 0
    for hz, width, db in TANK_MODES:
        mode = cavity(air, [(hz, width, 0)]) * np.sqrt(width)
        tank = tank + mode * undb(db + 2 * walk(4))
    tank = swaying(unit(tank)) * undb(TANK_DB)
    return opening * (roaming(rush) + valve * (hiss + tank))


def trickle():
    """A thin stream from the refill tube tinkles faintly into the emptied bowl, less as the bowl fills."""
    tinkle = bubbles([(900, -4), (1600, 0), (2400, -5), (3600, -7), (7000, -16)], count=5000, cycles=60,
                     spread_db=1.2, glide=0.04, surge_db=1.5, surge_rate=6)
    return tinkle * np.interp(TIME, [4.5, 5.0, 6.0], [0, 1, 0.5]) * undb(-60.0)


# wall reflections, which shift as the microphone sways: delay/s, level/dB
WALL_ECHOES = [(.0011, -11), (.0019, -11), (.0031, -9), (.0047, -9), (.0073, -10), (.0109, -11)]
SWAY_S, SWAY_RATE = 0.00013, 2.2  # delay drift in seconds, turning points per second


def swaying(x):
    """Near walls comb a sound into whistly strands that drift as the microphone moves."""
    echoes = 0
    for delay, db in WALL_ECHOES:
        heard = TIME - delay - SWAY_S * walk(SWAY_RATE)
        echoes = echoes + undb(db) * np.interp(heard, TIME, x)
    return x + echoes


# share of the tiled room in the sound: f/Hz, level/dB
ROOM_SHARE = [(60, -14), (200, -10), (400, -10), (800, -5), (2000, -1.5), (4500, -1.5), (8000, -7),
              (15000, -6)]
ROOM_T60_S = 0.11


def bathroom(x, delay_s=0.0037):
    """Close tiled walls add a short tail, different on each side and for each place in the room."""
    t = TIME[:SR // 5]
    tail = rng.standard_normal((2, len(t))) * fade(t, ROOM_T60_S) * (t > delay_s)
    tail = colour(tail / np.sqrt(np.sum(tail ** 2, axis=1, keepdims=True)), ROOM_SHARE)
    return x + signal.oaconvolve(x[None], tail, axes=1)[:, :N]


def roaming(x, rad_per_s=5):
    """For a moving microphone the room's tail blends from one place into another, so no ring stays."""
    here, there = bathroom(x) - x, bathroom(x) - x
    return x + here * np.cos(rad_per_s * TIME) + there * np.sin(rad_per_s * TIME)


# colour of the still air: f/Hz, level/dB
QUIET = [(47, -30), (80, -13), (93, -24.5), (244, -23.5), (432, -34), (627, -38), (699, -40.5),
         (11000, -45.5), (15000, -56)]
QUIET_DB = -77


def quiet_room():
    """Mains hum over still air: a slightly wavering low tone and faint shaped noise."""
    hum = np.sin(2 * np.pi * 60.5 * TIME) * undb(-60.0 + 0.46 * walk(5.2))
    return hum + unit(colour(rng.standard_normal(N), QUIET)) * undb(QUIET_DB)


@njit
def ring_bubbles(start, hz, size, cycles, glide, length):
    """Each bubble is a fading sine that rises as it nears the surface."""
    out = np.zeros(length)
    for k in range(len(start)):
        life = int(cycles * SR / hz[k]) + 2
        w = 2 * np.pi * hz[k] / SR
        z = size[k] + 0j
        p = np.exp(1j * w - 5.5 / life)  # turn and fade of one sample
        bend = np.exp(1j * w * glide / life)  # makes each turn a little faster
        for i in range(start[k], min(start[k] + life, length)):
            z *= p
            p *= bend
            out[i] += z.imag
    return out


def bubbles(points, count, cycles, spread_db, glide, surge_db, surge_rate):
    """A surging cloud of bubbles, a few much louder than the rest (quieter if spread_db < 0); rms 1."""
    when, pitch, luck = rng.random((count, 3)).T
    hz = points[0][0] + pitch * (points[-1][0] - points[0][0])
    size = np.sqrt(hz) * undb(-spread_db * np.log(np.maximum(luck, 2e-3)))
    cloud = ring_bubbles((when * N).astype(np.int64), hz, size, float(cycles), float(glide), N)
    return unit(colour(cloud, points) * undb(surge_db * walk(surge_rate)))


def hoot(hz, flutter_rate, steady=0):
    """A note of an air column: a steady part and one whose size and phase wander; rms 1."""
    turn = 2 * np.pi * np.cumsum(hz * np.ones(N)) / SR
    return unit((steady + walk(flutter_rate)) * np.sin(turn) + walk(flutter_rate) * np.cos(turn))


def cavity(x, modes):
    """Ring an air space with resonances of f/Hz, width/Hz, level/dB; rms 1."""
    def response(f):
        total = 0
        for hz, width, db in modes:
            peak = undb(db) / (1 + 1j * (f * f - hz * hz) / (f * width))
            total = total + peak * np.exp(-np.log(f / hz) ** 2 * 2)  # trims the far skirts
        return total
    return unit(filtered(x, response))


def colour(x, points):
    """Shape a sound by points of f/Hz, level/dB, with slopes falling off outside them."""
    hz, db = np.transpose(points)

    def response(f):
        inside = undb(np.interp(np.log(f), np.log(hz), db))
        return inside * np.minimum(f / hz[0], 1) ** 2 * np.minimum(hz[-1] / f, 1) ** 4
    return filtered(x, response)


def filtered(x, response):
    """Filter by a response given as a function of frequency."""
    size = next_fast_len(x.shape[-1] + 4096, real=True)
    f = np.fft.rfftfreq(size, 1 / SR) + 1e-3  # never exactly zero
    return irfft(rfft(x, size) * response(f), size)[..., :x.shape[-1]]


def gains(table):
    """One gain curve for each dB column, faded to silence outside the table."""
    s, *columns = np.transpose(table)
    gate = uniform_filter1d(1. * ((TIME > s[0]) & (TIME < s[-1])), size=800)
    return [gate * undb(np.interp(TIME, s, c)) for c in columns]


def arch(start_s, length_s):
    """Curve that swells to 1 and sinks again."""
    return np.sin(np.pi * np.clip((TIME - start_s) / length_s, 0, 1))


def walk(rate):
    """Random wander in straight lines between normal draws, rate draws per second."""
    knots = rng.standard_normal(4096)
    return np.interp(TIME * rate, np.arange(len(knots)), knots)


def fade(t, t60):
    """Free decay, 60 dB in t60 seconds."""
    return np.exp(-np.log(1000) * t / max(t60, 1e-3))


def undb(db):
    """Decibels to gain."""
    return 10 ** (np.asarray(db) / 20)


def unit(x):
    """Scale to rms 1."""
    return x / np.sqrt(np.mean(x ** 2))


def add(track, s, sound):
    """Mix a sound in at time s."""
    start = int(s * SR)
    track[start:start + len(sound)] += sound[:N - start]


def scene():
    """The handle, the flush, the refill and the closing lid, each from its own place in the bathroom."""
    crackle, fizz = spray()
    seat = knocks(SEAT_KNOCKS, SEAT_MODES, contact_s=0.00087, crack_t60=0.085, boom_t60=0.38, damped_t60=0.7)
    lid = knocks(LID_KNOCKS, LID_MODES, contact_s=0.0025, crack_t60=0.075, boom_t60=0.3, damped_t60=0.7)
    handle = knocks(HANDLE_KNOCKS, HANDLE_MODES,
                    contact_s=0.00027, crack_t60=0.093, boom_t60=0.4, damped_t60=0.8)
    tick = knocks(TICKS, TICK_MODES, contact_s=0.001, crack_t60=0.03, boom_t60=0.1, damped_t60=0.5)
    rim = rim_air() + surges() + crackle + seat + lid
    bowl = inflow() + fizz + plops() + drops()
    trap = siphon() + drain() + glugs()
    tank = bathroom(tick + handle + trickle()) + refill()
    return bathroom(rim) + bathroom(bowl) + bathroom(trap) + tank + quiet_room()


# phase between the two channels: f/Hz, phase/rad
CHANNEL_PHASE = [(0, 0), (1890, -0.1), (2670, 2.5), (3620, 3.0), (6290, 8.9), (7060, 12.6), (8530, 9.7),
                 (9560, 9.2), (10800, 6.6), (12100, 5.7), (13200, 3.1), (14400, 2.9), (15200, -0.0),
                 (16400, 0.1)]
LOW_CUT_HZ, TOP_HZ = 35, 15900


def record(dry):
    """The two channels are turned against each other, in and out of phase across the treble; the deepest bass
    and the top are cut."""
    hz, radians = np.transpose(CHANNEL_PHASE)

    def turn_channel(x, side):
        """Turn one channel by half the phase and cut its deepest bass."""
        return filtered(x, lambda f: np.exp(0.5j * side * np.interp(f, hz, radians))
                        * np.minimum(f / LOW_CUT_HZ, 1) ** 4)
    channels = [turn_channel(x, side) for x, side in zip(dry, (1, -1))]
    return signal.sosfilt(signal.ellip(10, 0.2, 70, TOP_HZ, fs=SR, output="sos"), channels)


dry = scene()
out = record(dry)
log_audio(out)
```